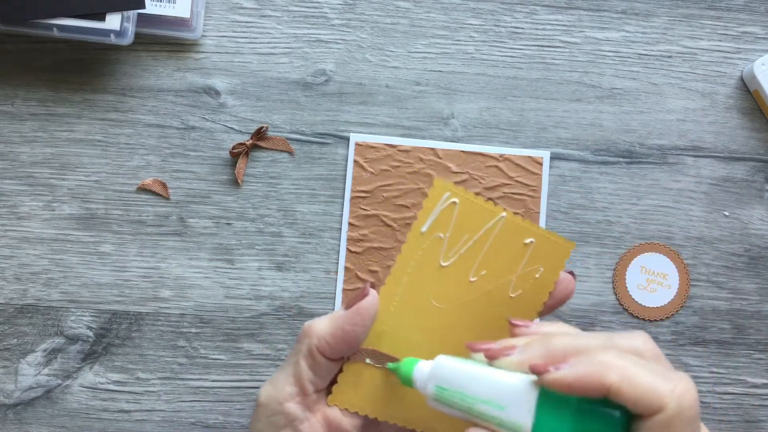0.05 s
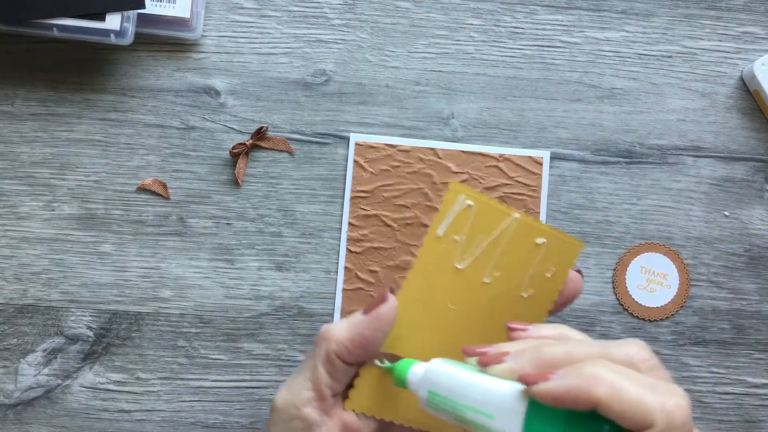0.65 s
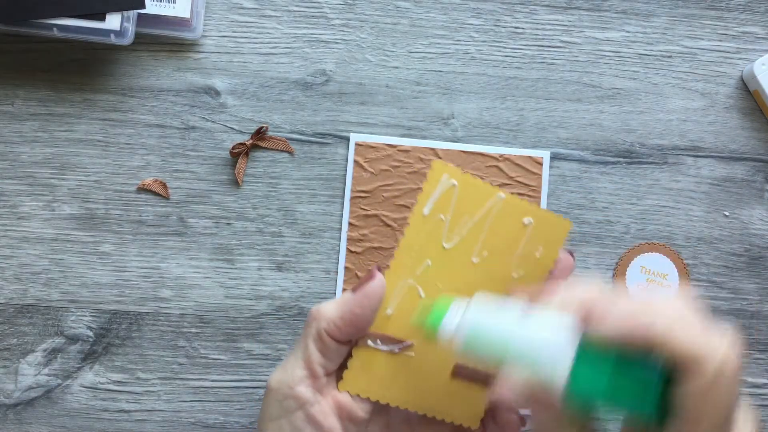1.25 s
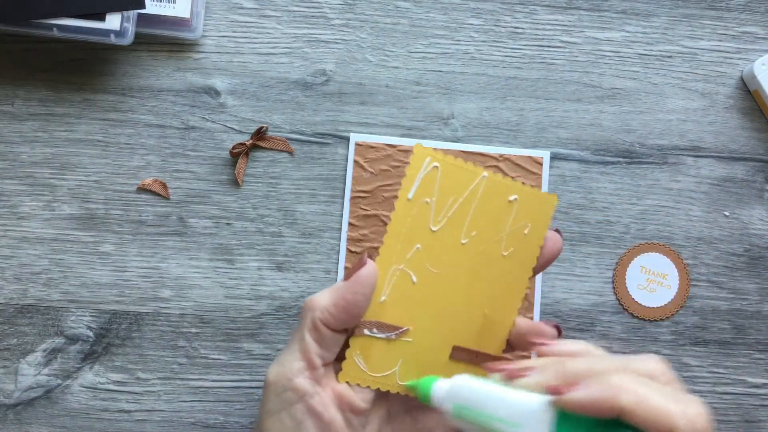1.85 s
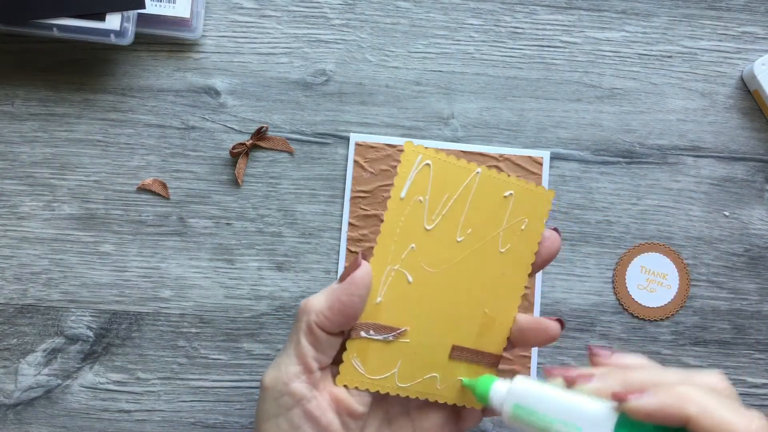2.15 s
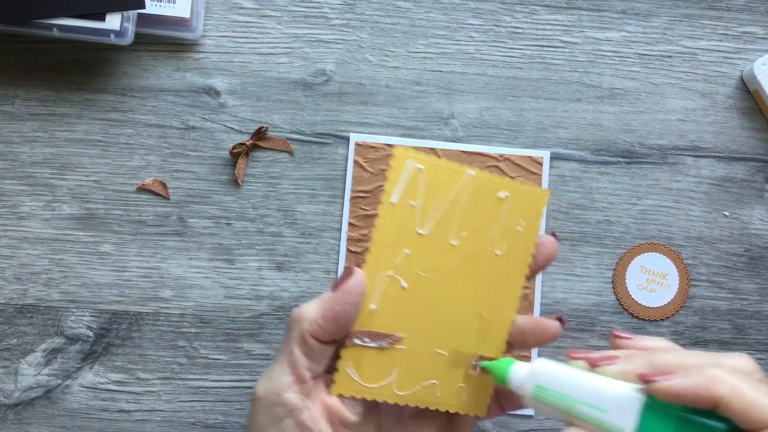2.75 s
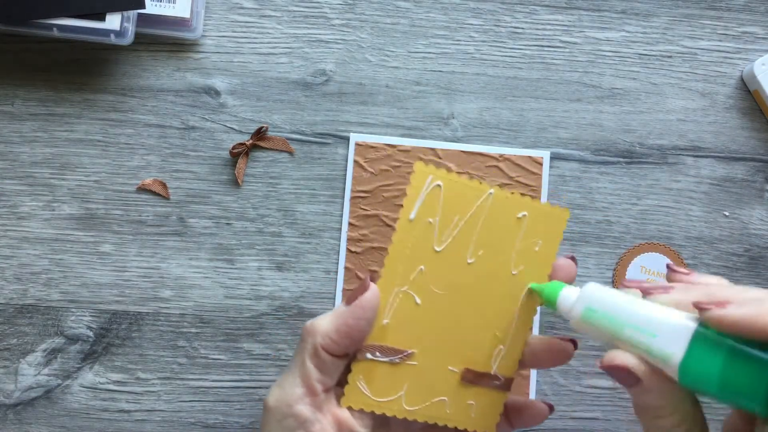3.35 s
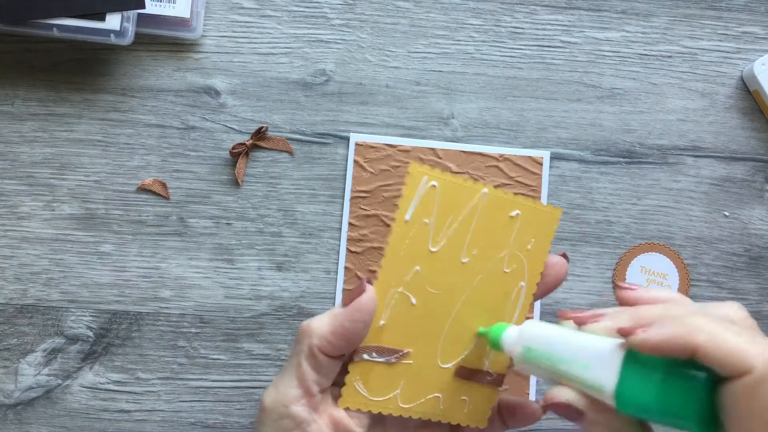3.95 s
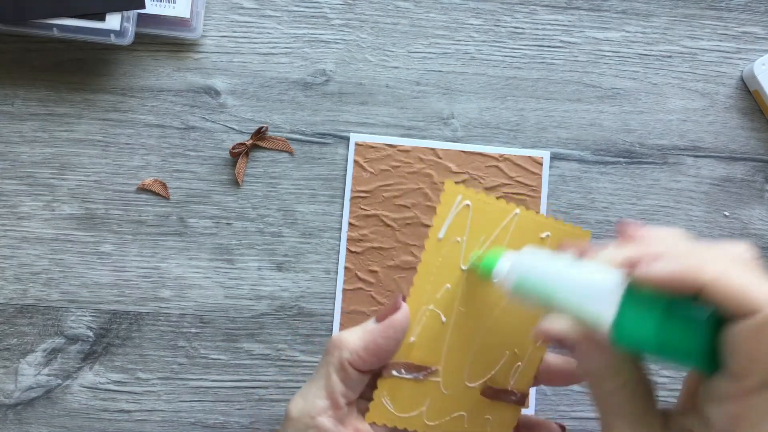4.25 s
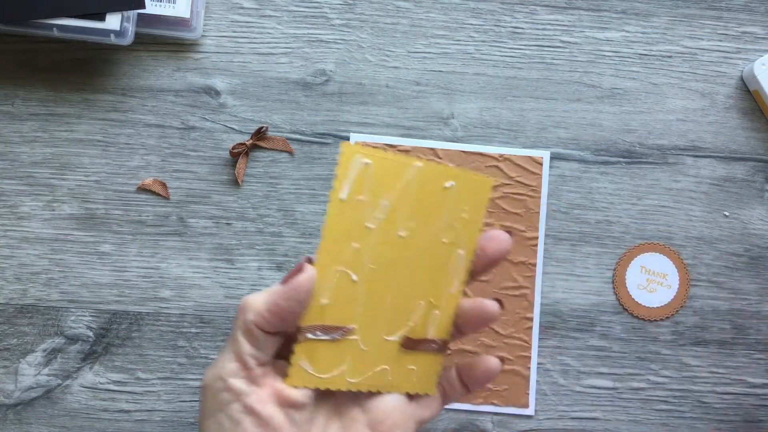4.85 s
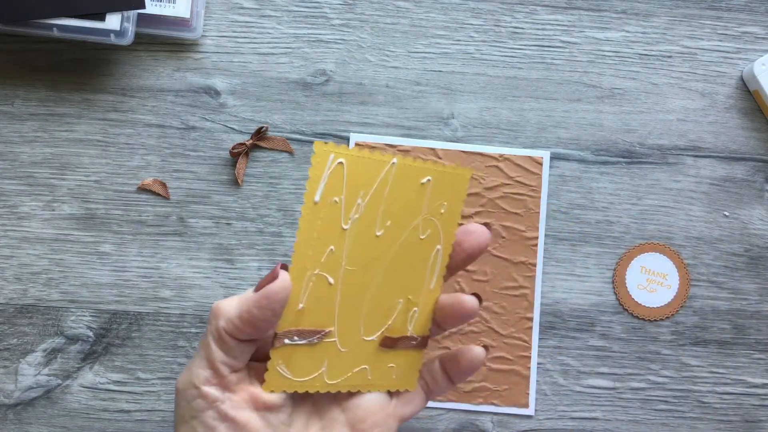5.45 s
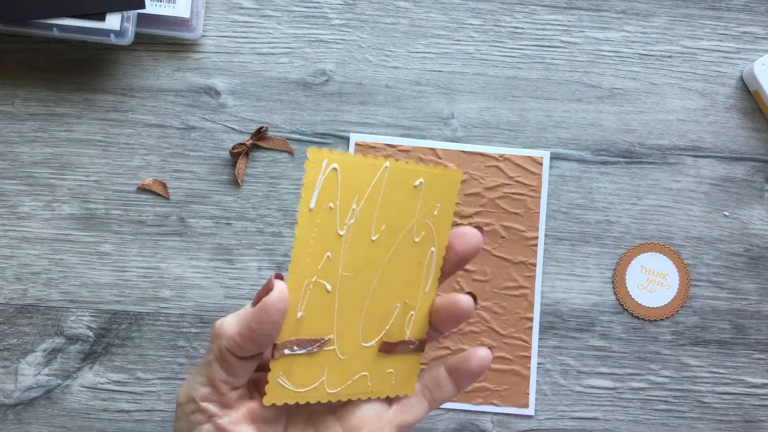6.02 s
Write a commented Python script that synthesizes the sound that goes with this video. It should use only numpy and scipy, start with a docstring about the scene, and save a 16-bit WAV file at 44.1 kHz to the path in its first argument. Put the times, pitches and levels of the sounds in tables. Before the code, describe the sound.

A glue bottle's nozzle faintly scratches and taps on card, then the bottle is set down on a desk with a hollow, rattling knock.

```python
"""A plastic glue bottle's nozzle rubs and scratches in short strokes over hand-held cardstock, close to
one microphone above a desk. Glue pops at the tip, and the tip taps the card. The card ticks and slides
in the fingers; then the bottle is set down, rocks and knocks again, booming the desk and ringing its
own hollow shell. Mains hum and a low rumble fill the small room throughout."""
import sys
import numpy as np
from scipy import signal
from scipy.fft import rfft, irfft, next_fast_len
from scipy.io import wavfile
from scipy.ndimage import uniform_filter1d, map_coordinates

SR = 44100
rng = np.random.default_rng(int(sys.argv[2]) if len(sys.argv) > 2 else 0)


def pcm_store(signal):
    """Save signal as 16-bit PCM."""
    levels = np.round(np.clip(np.atleast_2d(signal), -1, 1) * 32767)
    wavfile.write(sys.argv[1], SR, levels.astype(np.int16).T)


N = 268304
TIME = np.arange(N) / SR
AGE = np.arange(SR // 3) / SR  # seconds since a contact
TOP_HZ = 16300  # the recorder's band limit


def amp(db):
    """Decibels to gain."""
    return 10 ** (np.asarray(db) / 20)


def unit(x):
    """x at rms 1."""
    return x / np.sqrt(np.mean(x ** 2) + 1e-20)


def decay(t60):
    """A gain that falls 60 dB in t60 seconds."""
    return amp(-60 * AGE / t60)


def along(points, hz):
    """(Hz, value) points read on a log axis."""
    point_hz, values = np.transpose(points)
    return np.interp(np.log(hz + 1), np.log(point_hz), values)


def wobble(rate):
    """A smooth random curve, rate knots a second."""
    return map_coordinates(rng.standard_normal(int(N * rate / SR) + 4), [TIME * rate])


def coloured(x, spectrum):
    """x shaped by a spectrum that falls away under its first point, at rms 1."""
    size = next_fast_len(len(x) + 4096)
    hz = np.fft.rfftfreq(size, 1 / SR)
    skirt = np.minimum(hz / spectrum[0][0], 1) ** 2
    shaped = rfft(x, size) * amp(along(spectrum, hz)) * skirt
    return unit(irfft(shaped, size)[:len(x)])


def burst(spectrum, t60):
    """A sudden puff of coloured noise that dies away."""
    return coloured(rng.standard_normal(len(AGE)), spectrum) * decay(t60)


def add(track, start, sound):
    """Mix a sound into the track at start seconds."""
    part = track[round(start * SR):][:len(sound)]
    part += sound[:len(part)]


def friction(per_second, spread_db, smooth):
    """Tiny slips of uneven size over a smooth rush."""
    slipping = rng.random(N) < per_second / SR
    sizes = rng.standard_normal(N) * amp(spread_db * rng.standard_normal(N))
    return unit(unit(slipping * sizes) + smooth * rng.standard_normal(N))


def arch(peak, swell, fade, edge_db=15.5, roundness=1.67):
    """A rounded gain curve that swells up to the peak time, then fades."""
    away = np.maximum((peak - TIME) / swell, (TIME - peak) / fade)
    return amp(-edge_db * np.minimum(away, 10) ** roundness)


def swell_gains(rows):
    """A run of swells, as one gain curve for each level column."""
    return sum(np.outer(amp(db), arch(peak, swell, fade)) for peak, swell, fade, *db in rows)


def desk_echo(x, delay_s, drift, share):
    """x plus its echo from the desk; the delay drifts with the hand's height, so hollow bands wander."""
    lag = delay_s * SR * np.exp(drift * wobble(3))
    return unit(x + share * map_coordinates(x, [np.arange(N) - lag], order=3))


def flexing(x, depth_db):
    """The card bends in the hand, so its resonances come and go across the spectrum."""
    bands = signal.stft(x, nperseg=512)[2]
    swing = rng.standard_normal(bands.shape)
    for _ in range(2):
        swing = uniform_filter1d(swing, size=4, axis=0)  # across frequency
        swing = uniform_filter1d(swing, size=16, axis=1)  # across time
    bands = bands * amp(depth_db * unit(swing))
    return unit(signal.istft(bands, nperseg=512)[1][:N])


# Spectra of the card as a sounding board, the bottle's neck and the paper fibres.
# Each row: frequency in Hz, relative density in dB.
RUB_SPECTRUM = [(200, -3), (310, 5), (420, -0.5), (540, -5), (680, -3), (950, -1), (1300, 2), (1650, -5.5),
                (1950, -8.5), (2600, -14), (4400, -55)]
SCRATCH_SPECTRUM = [(1200, -19), (1650, -8), (2000, -21), (2300, -10), (2550, 3), (2850, -1.5),
                    (3150, -0.5), (3700, -12.5), (5000, -39), (9000, -51)]
RASP_SPECTRUM = [(2800, -27), (3900, 3), (4600, 0.5), (5300, -1), (6200, -1), (7600, -6.5), (10000, -8.5),
                 (13000, -17), (16000, -21)]
# First a faint midrange tail of an earlier sound, fading at the start; then the nozzle's strokes.
# Each row: peak time, swell and fade in seconds, then levels of rub, scratch and rasp in dB.
TAIL_AND_STROKES = [ (.02, 0.091, .11, -72.5, -87, -86.5), (.34, 0.072, 0.05, -80, -92, -85),
                    (.392, 0.029, 0.036, -72, -72.5, -71), (.65, 0.045, 0.071, -81, -90.5, -87.5),
                    (.728, 0.039, 0.022, -78.5, -77, -76), (.885, .025, 0.049, -67.5, -88, -76),
                    (1.005, 0.04, 0.03, -75.5, -83, -75.5), (1.11, 0.047, 0.065, -68, -76.5, -74.5),
                    (1.21, .012, 0.013, -84, -82, -84), (1.64, 0.14, 0.15, -82.5, -84.5, -81.5),
                    (1.9, 0.1, 0.15, -82.5, -84, -84.5), (2.105, 0.047, 0.12, -79, -80.5, -83),
                    (2.292, 0.029, 0.013, -83, -79, -72.5), (2.575, 0.088, 0.058, -73, -75, -79.5),
                    (2.695, 0.021, 0.027, -71, -69.5, -74.5), (2.75, .015, 0.029, -79, -74, -71.5),
                    (2.92, 0.033, 0.12, -81.5, -79.5, -83), (3.12, 0.034, .06, -75.5, -74.5, -80.5),
                    (3.252, .035, 0.046, -78, -68, -72), (3.32, 0.054, 0.072, -74, -82, -79.5),
                    (3.45, 0.06, 0.032, -80, -77.5, -77.5), (3.485, 0.027, 0.019, -87, -72, -87),
                    (3.64, 0.12, 0.059, -77, -74.5, -75), (3.785, 0.083, 0.082, -60.5, -63.5, -71),
                    (3.94, 0.038, 0.043, -71, -67, -70.5), (4.07, 0.074, 0.04, -63.5, -67, -73.5),
                    (4.2, 0.076, 0.11, -65.5, -68.5, -71), (4.435, .045, 0.073, -59, -68, -70.5),
                    (4.53, 0.022, 0.0076, -87, -71, -82), ]


def nozzle_strokes():
    """After a faint tail, the tip catches fibres: the card rubs, the neck scratches, the fibres rasp."""
    rub_gain, scratch_gain, rasp_gain = swell_gains(TAIL_AND_STROKES)
    rub = coloured(friction(per_second=1000, spread_db=3, smooth=0.81), RUB_SPECTRUM)
    scratch = coloured(friction(per_second=1600, spread_db=0.5, smooth=0.8), SCRATCH_SPECTRUM)
    rasp = coloured(friction(per_second=2300, spread_db=-1, smooth=1), RASP_SPECTRUM)
    rub = flexing(desk_echo(rub, delay_s=0.002255, drift=0.21, share=0.51), depth_db=3.5)
    scratch = flexing(scratch, depth_db=3)
    rasp = flexing(desk_echo(rasp, delay_s=0.00068, drift=0.058, share=0.1), depth_db=4)
    flicker = amp(1.27 * wobble(55))
    return (rub_gain * rub + scratch_gain * scratch + rasp_gain * rasp) * flicker


# Two mains tones and a whine. Each row: frequency in Hz, rms level in dB.
HUM_TONES = [(59.2, -69), (118.4, -62), (9001, -100)]
# The room's rumble and hiss. Each row: frequency in Hz, relative density in dB.
FLOOR_SPECTRUM = [(27, -21.5), (40, -1.5), (57, -2.5), (82, -4), (120, -2.5), (150, -13.5), (290, -20),
                  (420, -30.5), (650, -32), (1000, -39), (2500, -41), (5000, -46), (13000, -47.5),
                  (15500, -62.5)]


def room_tone():
    """Behind the close sounds, a wavering mains hum and a thin whine lie over rumble and faint hiss."""
    hum = np.zeros(N)
    for hz, db in HUM_TONES:
        gain = np.sqrt(2) * amp(db + 0.58 * wobble(8))
        hum += gain * np.sin(2 * np.pi * hz * TIME + 0.15 * wobble(1.6))
    return hum + amp(-63.5) * coloured(rng.standard_normal(N), FLOOR_SPECTRUM)


# Wet pops at the nozzle. Each row: start in seconds, pitch in Hz, level in dB, glide in Hz per second.
GLUE_POPS = [(.192, 610, -64.5, 300), (0.191, 302, -54, -200), (.451, 1050, -63, 7000)]


def glue_pops():
    """Little air bubbles burst in the glue, each a short gliding note."""
    out = np.zeros(N)
    envelope = (1 - np.exp(-AGE / 0.0011)) * np.exp(-AGE / 0.0067)
    for start, hz, db, glide in GLUE_POPS:
        note = np.sin(2 * np.pi * (hz + glide * AGE / 2) * AGE)
        add(out, start, amp(db) * envelope * note)
    return out


# The small room around the desk. Each row: frequency in Hz, seconds to fall 60 dB.
ROOM_DECAY = [(150, 0.36), (1000, 0.23), (3000, 0.2), (14000, 0.19)]


def room(x, wet_db):
    """x reaches the microphone directly, then as the room's tail, whose treble dies first."""
    hz, seconds, bands = signal.stft(rng.standard_normal(SR // 2), SR, nperseg=256)
    fading = amp(-60 * seconds / along(ROOM_DECAY, hz)[:, None])
    tail = signal.istft(bands * fading, SR, nperseg=256)[1]
    gap = np.zeros(SR // 300)
    response = np.concatenate([gap, tail / np.linalg.norm(tail)])
    return x + amp(wet_db) * signal.fftconvolve(x, response)[:N]


# Plastic striking card. Each row: frequency in Hz, relative density in dB.
CLACK_SPECTRUM = [(450, -29), (620, -3.5), (900, -13), (1300, 8), (1600, -19), (2000, -35), (2600, 6.5),
                  (3100, 8.5), (3700, -9), (4400, -5), (5500, -13.5), (8000, -22.5), (16000, -25)]
# The nozzle meets the card. Each row: start in seconds, level in dB, treble cutoff in Hz.
NOZZLE_TAPS = [(0.382, -58.5, 8000), (0.869, -68, 5000), (2.29, -77, 12000), (2.595, -45, 3760),
               (2.690, -58.5, 7000), (2.778, -55, 7000), (2.7836, -37, 15100), (2.915, -61, 7000),
               (3.244, -62, 7000), (4.401, -60, 5000)]


def nozzle_taps():
    """The tip touches down: a dry clack, some dull and some bright, with a faint after-ring."""
    out = np.zeros(N)
    for start, db, cutoff_hz in NOZZLE_TAPS:
        clack = amp(0.5) * burst(CLACK_SPECTRUM, t60=0.015)
        after_ring = amp(-14) * burst(CLACK_SPECTRUM, t60=0.065)
        treble_cut = signal.butter(2, cutoff_hz, fs=SR, output="sos")
        add(out, start, amp(db) * signal.sosfilt(treble_cut, clack + after_ring))
    return room(out, wet_db=-18.5)


# Spectra of the card's tick and slide. Each row: frequency in Hz, relative density in dB.
TICK_SPECTRUM = [(400, -16), (1100, -11), (1900, 1.5), (2800, -3), (4200, 1.5), (7000, -5.5), (10000, 0.5),
                 (13000, 7), (16000, 1)]
SLIDE_SPECTRUM = [(700, -14), (1500, -3.5), (2200, -3.5), (3000, 0), (4000, -5), (7000, -6), (11000, -8.5),
                  (15500, -6.5)]
# Flicks of the card's edge. Each row: start in seconds, level in dB.
CARD_TICKS = [(4.549, -57.5), (4.565, -57), (4.57, -54), (4.5743, -38.5), (4.713, -59), (4.867, -55.5),
              (4.8973, -42), (4.9556, -45)]
# Slides in the fingers. Each row: fastest moment, swell and fade in seconds, level in dB.
CARD_SLIDES = [(4.63, 0.055, .03, -73), (4.67, 0.013, 0.026, -62.5), (4.715, 0.014, 0.042, -68),
               (4.87, 0.045, 0.048, -73.5), (4.908, 0.02, 0.028, -71.5), (5.045, 0.046, 0.12, -75.5),
               (5.24, 0.051, 0.057, -74), (5.41, 0.083, 0.032, -78)]


def card_handling():
    """Stiff card shifts near the microphone: its edge ticks on fingers and nails; it slides brightly."""
    ticks = np.zeros(N)
    for start, db in CARD_TICKS:
        snap = burst(TICK_SPECTRUM, t60=0.013)
        after_ring = amp(-21.5) * burst(TICK_SPECTRUM, t60=0.11)
        add(ticks, start, amp(db) * (snap + after_ring))
    slide_gain = swell_gains(CARD_SLIDES)[0]
    slide = coloured(friction(per_second=820, spread_db=7, smooth=1.6), SLIDE_SPECTRUM)
    return room(ticks, wet_db=-14.5) + slide_gain * slide


def ring(modes, scatter_db, attack_s, heft_db=0):
    """Damped modes struck together, with new strengths and signs at each blow."""
    hz, db, t60 = np.transpose(modes)
    strengths = amp(db + scatter_db * rng.standard_normal(len(hz)) - heft_db * np.log2(hz))
    strengths *= np.sqrt(2) / np.linalg.norm(strengths)
    signs = rng.choice([-1, 1], len(hz))
    partials = np.sin(2 * np.pi * hz[:, None] * AGE) * decay(t60[:, None])
    rise = 1 - np.exp(-AGE / attack_s)
    return (strengths * signs) @ partials * rise


# Modes of the desk and the bottle. Each row: frequency in Hz, relative level in dB, seconds to fall 60 dB.
DESK_MODES = [(85, -18, 0.15), (121.2, -4, 0.16), (165.8, -10, 0.27), (254.8, 2.5, 0.12), (278, -18, 0.039),
              (361.8, -8.5, 0.093), (523, -10.5, 0.042)]
SHELL_MODES = [(622, -2, 0.065), (823, -9, 0.083), (921, 3.5, 0.076), (1140, -5, 0.068), (1267, -14, 0.076),
               (1327, 8, 0.032), (1504, 1, .05), (1696, 4.5, 0.045), (1766, 0.5, 0.092),
               (1970, 11.5, 0.016), (2285, 3.5, 0.032), (2520, -3, 0.041), (2750, 5.5, 0.032),
               (2860, -21, 0.049), (3530, -32, 0.025)]
# Spectra of the bottle's crack and chatter. Each row: frequency in Hz, relative density in dB.
CRACK_SPECTRUM = [(500, -5), (2500, 8.5), (4000, 3.5), (6200, -1.5), (8000, -7.5), (12000, -11),
                  (16000, -22)]
CHATTER_SPECTRUM = [(300, -1), (600, -3), (1000, 9), (1800, -2), (2750, -14.5), (3300, -13), (6000, -20.5),
                    (9000, -25.5), (16000, -39)]
# The bottle hits the desk. Each row: start in seconds, desk level in dB, heft (the desk's tilt toward
# the bass) in dB per octave, shell level in dB, crack level in dB.
BOTTLE_KNOCKS = [ (5.7513, -31, 0, -37, -44.5), (5.756, -26, -6.5, -19.5, -33.5),
                 (5.778, -42, -4, -46, -33.5), (5.799, -37.5, 0, -28, -38), (5.812, -44, 2, -37, -64),
                 (5.838, -52, 0, -36.5, -62), (5.863, -46, -4, -50, -52), (5.875, -53, 7, -38.5, -59),
                 (5.934, -50, 12, -71, -57), (5.9825, -45, -7, -55, -44.5), (5.9888, -36.5, -19, -60, -44),
                 (5.993, -56, -5, -63, -39), (6.0116, -21, 0, -24.5, -30.5), (6.0239, -33.5, -2, -53, -51),
                 (6.048, -29.5, 10, -46, -43.5), (6.065, -53, 10, -44, -53), ]


def bottle_knocks():
    """Below the microphone each contact booms the desk, rings the hollow shell and cracks at the rim."""
    out = np.zeros(N)
    for start, desk_db, heft_db, shell_db, crack_db in BOTTLE_KNOCKS:
        desk = ring(DESK_MODES, scatter_db=2.5, attack_s=0.0022, heft_db=heft_db)
        shell = ring(SHELL_MODES, scatter_db=1.5, attack_s=0.0011)
        shell += amp(-8) * burst(CHATTER_SPECTRUM, t60=0.04)
        crack = burst(CRACK_SPECTRUM, t60=0.021)
        add(out, start, amp(desk_db) * desk + amp(shell_db) * shell + amp(crack_db) * crack)
    return room(out, wet_db=-10.5)


# The rim skids on the desk. Each row: start in seconds, ring level in dB, chatter level in dB.
RIM_SKIDS = [(5.768, -32.5, -37.5), (5.809, -41.5, -53), (5.837, -45, -56), (5.861, -44, -46.5),
             (5.93, -53, -55), (5.973, -40.5, -44.5), (6.017, -47, -47.5), (6.045, -52, -45)]
# The skid's falling note. Each row: time in seconds, pitch in Hz.
RIM_PITCH = [(5.766, 835.7), (5.82, 817), (5.867, 640.7), (6.08, 604)]


def bottle_skid(attack_s=0.0024):
    """Between knocks the rim judders on the desk, with a rough ring that sinks as the bottle settles."""
    ring_gain, chatter_gain = np.zeros((2, N))
    rise = 1 - np.exp(-AGE / attack_s)
    for start, ring_db, chatter_db in RIM_SKIDS:
        add(ring_gain, start, amp(ring_db) * rise * decay(t60=0.097))
        add(chatter_gain, start, amp(chatter_db) * rise * decay(t60=0.25))
    seconds, pitches = np.transpose(RIM_PITCH)
    hz = np.interp(TIME, seconds, pitches) * (1 + 0.0347 * wobble(250))
    phase = 2 * np.pi * np.cumsum(hz) / SR
    rough_ring = np.sqrt(2) * np.sin(phase) * amp(4.1 * wobble(140))
    chatter = coloured(friction(per_second=290, spread_db=-0.5, smooth=1), CHATTER_SPECTRUM)
    return room(ring_gain * rough_ring + chatter_gain * chatter, wet_db=-8.5)


def scene():
    """Everything at the one microphone above the desk."""
    mix = nozzle_strokes() + room_tone() + glue_pops() + nozzle_taps()
    mix += card_handling() + bottle_knocks() + bottle_skid()
    return mix[None]


def record(dry):
    """The microphone sheds the deepest bass and the recorder keeps nothing above its band limit."""
    low_cut = signal.butter(3, 36, "highpass", fs=SR, output="sos")
    size = next_fast_len(N + SR // 4)
    spectrum = rfft(signal.sosfilt(low_cut, dry), size)
    in_band = np.fft.rfftfreq(size, 1 / SR) < TOP_HZ
    return irfft(spectrum * in_band, size)[..., :N]


dry = scene()
out = record(dry)
pcm_store(out)
```